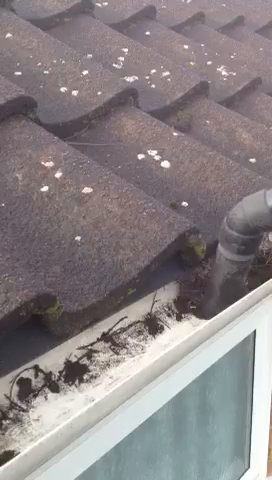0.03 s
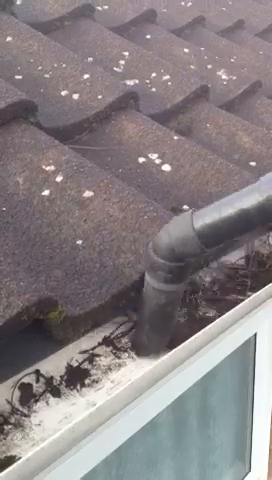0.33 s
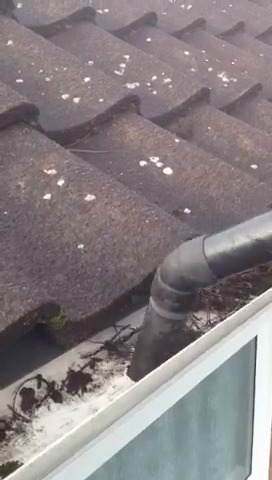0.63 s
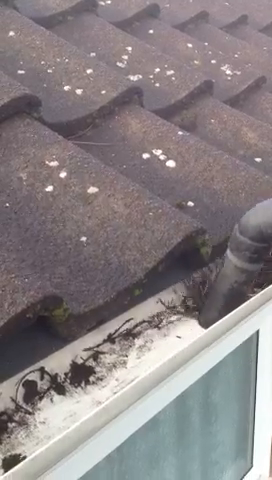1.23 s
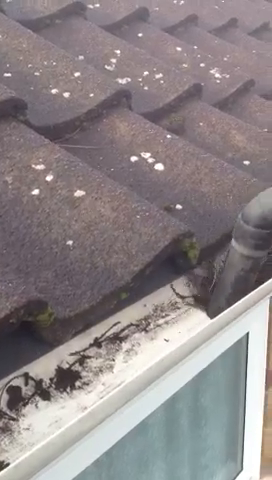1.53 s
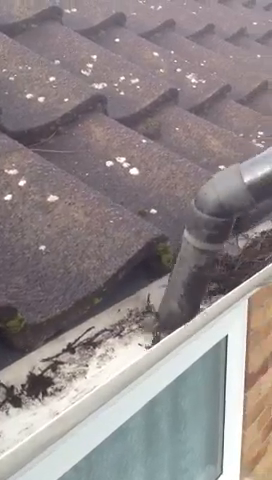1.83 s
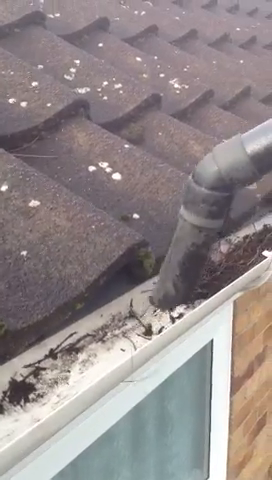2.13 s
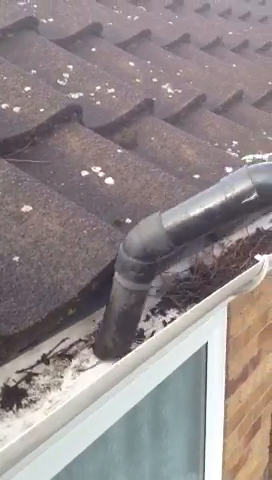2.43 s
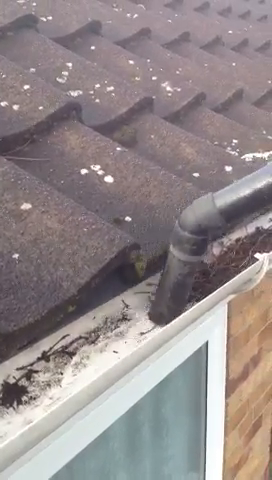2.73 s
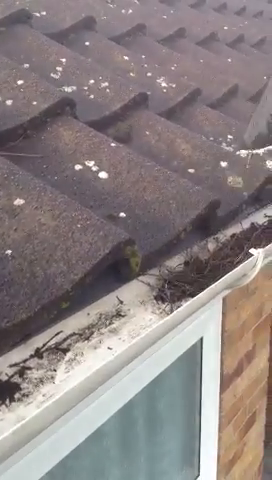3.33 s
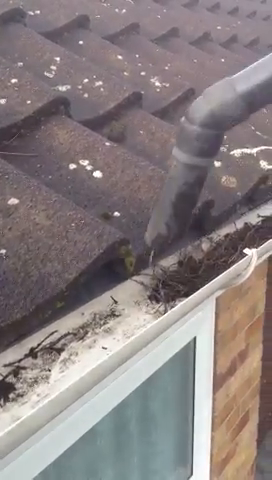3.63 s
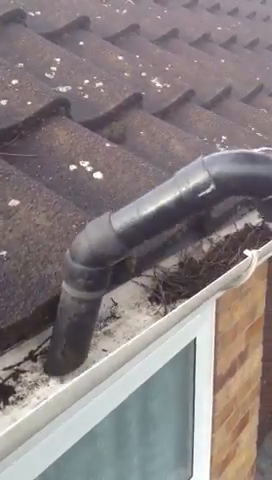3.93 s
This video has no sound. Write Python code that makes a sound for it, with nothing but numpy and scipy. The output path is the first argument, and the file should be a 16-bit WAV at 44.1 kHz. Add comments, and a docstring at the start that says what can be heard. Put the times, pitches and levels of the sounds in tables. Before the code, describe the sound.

Rushing vacuum suction clears a roof gutter, fading and surging over humming, whining motors.

```python
"""A gutter vacuum works along a roof, over the beating hum and whine of two suction motors on the
ground that run at almost the same speed. At first turbulent air hisses and roars into the nozzle near
wet debris, hooting and whistling through narrow gaps while grit ticks and clumps thud down the pipe.
Near 2 s the rush sinks; at 2.5 s it surges with a thud and a rasp. After 3 s it falls away again,
leaving the motors and faint hoots, and the roar returns just before the end at 4 s."""
import sys
import numpy as np
from scipy import signal
from scipy.io import wavfile

SR = 44100
rng = np.random.default_rng(int(sys.argv[2]) if len(sys.argv) > 2 else 0)


def bounce(signal):
    """Save signal as a 16-bit WAV file at the path given by the first command-line argument."""
    frames = np.transpose(np.atleast_2d(signal))
    limited = np.clip(frames, -1, 1)
    pcm = np.round(limited * 32767).astype(np.int16)
    wavfile.write(sys.argv[1], SR, pcm)


N = 176400
TIME = np.arange(N) / SR

# Spectra of the exhaust and the hose. Each row: frequency in Hz, relative density in dB.
EXHAUST_SPECTRUM = [(300, 3.5), (520, 0.5), (800, 8), (1300, 1.5), (1800, 0), (8000, -3), (9700, -9.5),
                    (16000, -16.5)]
RUMBLE_SPECTRUM = [(60, -30), (90, -30), (130, -7.5), (330, 4), (550, -12)]
# Mean speed of the two motors. Each row: time in seconds, rotation rate in Hz.
MEAN_SPEED = [(0, 326.4), (.6, 326.6), (1.3, 327.3), (2, 326.8), (2.7, 326), (3.3, 321.7), (4, 326.6)]
# How far the first motor has run ahead of the second. Each row: time in seconds, lead in turns.
PHASE_LEAD = [(0, -.15), (1.53, 1), (1.88, 1.333), (2.32, 1.667), (2.8, 2), (3.32, 2.333), (4, 2.71)]
# Motor tones. Each row: multiple of the speed, relative levels in dB of the first and second motor.
MOTOR_HARMONICS = [(1, -38.5, -39), (3, -76, -54.5), (6, -51, -53.5), (12, -55, -63)]
# The whine, all harmonics above the first. Each row: time in seconds, gain in dB.
WHINE_GAIN = [(1.7, -0.5), (2.4, 2.5), (2.7, -1.5), (3.15, -3.5), (3.8, -0.5)]
# Clumps in the pipe and wet debris in its mouth. Each row: centre and length in seconds, level in dB.
CLUMP_THUDS = [(0.175, 0.29, -41.5), (0.438, 0.1, -35.5), (1.995, 0.065, -34), (2.08, 0.063, -33.5),
               (2.468, 0.045, -25), (3.003, 0.068, -37)]
WET_RASPS = [(0.47, 0.19, -25.5), (0.597, 0.15, -25.5), (1.672, 0.064, -33.5), (2.475, 0.054, -37)]
# Spectra of those thuds and rasps. Each row: frequency in Hz, relative density in dB.
THUD_SPECTRUM = [(100, -13), (130, -1.5), (180, -5.5), (260, 7.5), (500, -13.5), (1200, -15), (3000, -29)]
RASP_SPECTRUM = [(1400, -20), (2000, 3), (3600, 0.5), (5000, -6)]
# Hard chips striking the rim. Each row: start in seconds, level in dB, centre frequency in Hz.
CHIP_STRIKES = [(1.125, -21, 3220), (1.82, -27, 6200), (2.013, -35, 6100)]
# Whistles at the rim. Each row: centre and length in seconds, first and last pitch in Hz, level in dB.
RIM_WHISTLES = [(0.099, 0.036, 7340, 7200, -17.5), (.635, 0.22, 6000, 4650, -24),
                (1.889, 0.06, 5250, 5450, -36)]
# Ringing of the half-blocked pipe. Each row: centre and length in seconds, pitch in Hz, level in dB.
PIPE_HOOTS = [(0.077, 0.095, 2620, -27), (0.5, .1, 3320, -29), (1.433, 0.39, 1190, -34.5),
              (1.49, 0.47, 3810, -36.5), (1.664, 0.23, 2560, -34.5), (2.77, 0.14, 2460, -38),
              (2.828, 0.56, 900, -42), (3.45, 0.88, 1310, -47)]
# Hiss in the gap under the nozzle, roar at its mouth. Each row: time in seconds, relative level in dB.
HISS_LEVEL = [(0, -22.5), (.11, -19), (.15, -22.5), (.33, -25.5), (.44, -20.5), (.61, -18.5), (.77, -23),
              (.87, -23), (1.04, -25.5), (1.19, -22.5), (1.29, -27.5), (1.44, -22.5), (1.55, -25),
              (1.68, -24), (1.75, -31), (1.92, -34.5), (1.98, -31.5), (2.2, -43), (2.42, -41.5),
              (2.47, -30.5), (2.8, -30), (2.94, -39.5), (3.13, -39.5), (3.19, -46), (3.88, -45), (4, -35.5)]
ROAR_LEVEL = [(0, -37.5), (.09, -26), (.17, -30.5), (.36, -31.5), (.44, -25), (.62, -28.5), (.72, -49),
              (.84, -33), (1.04, -35.5), (1.15, -28.5), (1.3, -33), (1.4, -28), (1.62, -38.5), (1.685, -26),
              (1.76, -41), (2.2, -47), (2.48, -34.5), (2.79, -33), (3.12, -50), (3.8, -52), (4, -26.5)]
# Source spectra of the hiss and the roar. Each row: frequency in Hz, relative density in dB.
HISS_SPECTRUM = [(250, -42), (1200, -7), (2000, -4), (5500, 3), (8200, 5), (9900, -4), (11500, 3),
                 (16000, 1.5)]
ROAR_SPECTRUM = [(150, -5), (280, 2), (520, -1), (900, 0), (2500, -2.5), (6000, 1)]
# Modes of the pipe mouth and the nozzle tube. Each row: frequency in Hz, bandwidth in Hz, gain in dB.
MOUTH_RESONANCES = [(844, 520, 5), (1260, 430, -7.5)]
TUBE_RESONANCES = [(2620, 320, -3.5), (3290, 360, -10), (3810, 350, -8.5), (4590, 220, -9.5),
                   (5410, 270, -9.5), (6360, 230, -14), (8500, 450, -3), (11300, 500, -16)]
# Bands that the tube partly cancels. Each row: frequency in Hz, bandwidth in Hz.
TUBE_ANTIRESONANCES = [(530, 210), (1950, 190), (2980, 96), (4300, 93)]


def from_db(db):
    """Amplitude grows tenfold for every 20 dB."""
    return 10 ** (np.asarray(db) / 20)


def rms_one(x):
    """Normalisation to unit rms."""
    return x / np.sqrt(np.mean(x ** 2) + 1e-20)


def in_time(rows):
    """Linear interpolation gives a control curve at every sample."""
    return np.interp(TIME, *np.transpose(rows))


def drift(rate_hz):
    """Low-pass filtering turns white noise into smooth random motion of unit rms."""
    step, settle = 40, 2000
    pole = np.exp(-2 * np.pi * step * rate_hz / SR)
    white = rng.standard_normal(N // step + settle + 2)
    slow = signal.lfilter([1], [1, -2 * pole, pole * pole], white)[settle:]
    return np.interp(np.arange(N) / step, np.arange(len(slow)), rms_one(slow))


def resonate(x, hz, width_hz):
    """A damped resonator, driven by x, with unit gain at its peak."""
    radius = np.exp(-np.pi * width_hz / SR)
    feedback = [1, -2 * radius * np.cos(2 * np.pi * hz / SR), radius ** 2]
    return signal.lfilter(np.array([1, 0, -1]) * (1 - radius ** 2) / 2, feedback, x + 1e-18)


def swell(centre, length):
    """A half-cosine envelope rises and falls about its centre."""
    return np.cos(np.pi * np.clip((TIME - centre) / length, -.5, .5))


def turbulence(spectrum, flicker_db, flicker_hz):
    """Turbulent noise of unit rms: each third-octave band fluctuates independently."""
    hz, db = np.transpose(spectrum)
    edges = 20 * 2 ** (np.arange(30) / 3)
    white, out = rng.standard_normal((2, N)), 0
    for k, (low, high) in enumerate(zip(edges, edges[1:])):
        flicker = flicker_db * drift(flicker_hz)
        if high > hz[0] and low < hz[-1]:
            level_db = np.interp(np.log(low * high) / 2, np.log(hz), db) + flicker
            band = signal.butter(2, [low, high], "band", fs=SR, output="sos")
            out += from_db(level_db) * signal.sosfilt(band, white[k % 2])
    return rms_one(out)


def steady_air():
    """Steady flow makes broadband noise: the exhaust blows and the hose rumbles."""
    exhaust = turbulence(EXHAUST_SPECTRUM, flicker_db=0.6, flicker_hz=8)
    rumble = turbulence(RUMBLE_SPECTRUM, flicker_db=3.5, flicker_hz=5.4)
    return from_db(-39) * exhaust + from_db(-44.5) * rumble


def motors(jitter_hz=0.52, waver_db=0.4, rise_db_per_s=0.7):
    """Interference: two motors slip in and out of step, and harmonic n beats n times as fast."""
    turns = np.cumsum(in_time(MEAN_SPEED) + jitter_hz * drift(22)) / SR
    lead, out = in_time(PHASE_LEAD), 0
    for order, first_db, second_db in MOTOR_HARMONICS:
        first = from_db(first_db) * np.sin(2 * np.pi * order * (turns + lead / 2))
        second = from_db(second_db) * np.sin(2 * np.pi * order * (turns - lead / 2))
        pair = first - second
        if order > 1:
            pair *= from_db(in_time(WHINE_GAIN))
        out += np.sqrt(2) * pair * from_db(waver_db * drift(20))
    return from_db(rise_db_per_s * (TIME - TIME.mean())) * out


def debris(chip_decay_s=0.01, chip_width_hz=1600, thud_cut_hz=120):
    """Impact and friction: soft clumps thud, hard chips click and die away, wet debris rasps."""
    thuds = sum(from_db(db) * swell(centre, length) for centre, length, db in CLUMP_THUDS)
    thuds *= turbulence(THUD_SPECTRUM, flicker_db=2.5, flicker_hz=15)
    thuds = signal.sosfilt(signal.butter(4, thud_cut_hz, "high", fs=SR, output="sos"), thuds)
    chips = 0
    for start, db, hz in CHIP_STRIKES:
        decay = (TIME >= start) * np.exp(-abs(TIME - start) / chip_decay_s)
        chips += from_db(db) * decay * rms_one(resonate(rng.standard_normal(N), hz, chip_width_hz))
    rasps = sum(from_db(db) * swell(centre, length) for centre, length, db in WET_RASPS)
    rasps *= turbulence(RASP_SPECTRUM, flicker_db=3, flicker_hz=95)
    return thuds + chips + rasps


def whistles(flutter_hz=260):
    """Narrow gaps sing a gliding tone; random modulation spreads it into a breathy band."""
    out = 0
    for centre, length, first_hz, last_hz, db in RIM_WHISTLES:
        pitch = np.interp(TIME, [centre - length / 2, centre + length / 2], [first_hz, last_hz])
        phase = 2 * np.pi * np.cumsum(pitch) / SR
        tone = drift(flutter_hz) * np.sin(phase) + drift(flutter_hz) * np.cos(phase)
        out += from_db(db) * swell(centre, length) * tone
    return out


def hoots(stage_width_hz=320):
    """Resonance: air over the half-blocked mouth excites one mode of the pipe for each hoot."""
    out = 0
    for centre, length, hz, db in PIPE_HOOTS:
        band = resonate(rng.standard_normal(N), hz, stage_width_hz)
        ringing = resonate(band, hz, stage_width_hz)
        out += from_db(db) * swell(centre, length) * rms_one(ringing)
    return out


def grit(grains_per_s=640, spread_db=2.5, quality_factor=4.95):
    """Shot noise: grains strike the tube at random, each ringing for a few cycles."""
    sizes = from_db(spread_db * np.minimum(rng.exponential(1, N), 5)) * rng.choice([-1, 1], N)
    impacts = sizes * (rng.random(N) < grains_per_s / SR)
    pitches = np.geomspace(1500, 14000, 16)
    pitch_index = rng.integers(0, len(pitches), N)
    ticks = sum(resonate(impacts * (pitch_index == k), hz, hz / quality_factor) / np.sqrt(hz)
                for k, hz in enumerate(pitches))
    return rms_one(ticks)


def nozzle_tube(air, sway_db=2.2, sway_hz=3, dip_depth=0.46):
    """Resonances, swaying in strength as the nozzle moves, and antiresonances colour the air noise."""
    piped = air + sum(from_db(db + sway_db * drift(sway_hz)) * resonate(air, hz, width)
                      for hz, width, db in TUBE_RESONANCES)
    for hz, width in TUBE_ANTIRESONANCES:
        piped -= dip_depth * resonate(piped, hz, width)
    return rms_one(piped) * air.std()  # the overall power is unchanged


def suction(grit_db=-12, direct_db=-10.5, flutter_db=1, flutter_hz=270):
    """Source and filter: gritty hiss from the gap and hollow roar from the mouth pass up the tube."""
    hiss = turbulence(HISS_SPECTRUM, flicker_db=1.15, flicker_hz=7.7) + from_db(grit_db) * grit()
    eddies = turbulence(ROAR_SPECTRUM, flicker_db=1.4, flicker_hz=15.4)
    ringing = sum(from_db(db) * resonate(eddies, hz, width) for hz, width, db in MOUTH_RESONANCES)
    roar = rms_one(from_db(direct_db) * eddies + ringing)
    air = from_db(in_time(HISS_LEVEL) + 0.5) * hiss + from_db(in_time(ROAR_LEVEL) - 0.5) * roar
    return nozzle_tube(air * from_db(flutter_db * drift(flutter_hz)))


def scene():
    """Superposition: all sources add at one microphone, which feeds both channels."""
    mono = suction() + hoots() + whistles() + debris() + motors() + steady_air()
    return np.array([mono, mono])


def record(dry, low_cut_hz=29, high_cut_hz=15400):
    """Band limiting: the small microphone loses the deepest bass, and the top is cut steeply."""
    thin = signal.sosfilt(signal.butter(2, low_cut_hz, "high", fs=SR, output="sos"), dry)
    return signal.sosfilt(signal.ellip(12, .1, 80, high_cut_hz, fs=SR, output="sos"), thin)


dry = scene()
out = record(dry)
bounce(out)
```